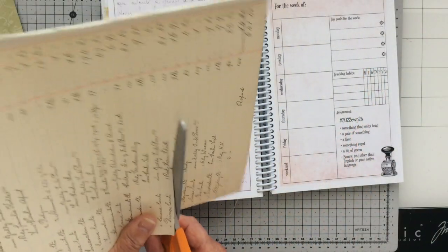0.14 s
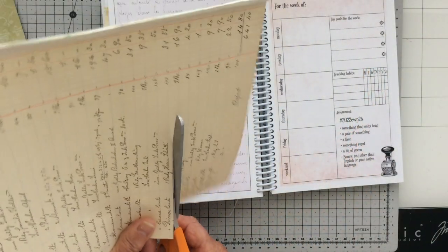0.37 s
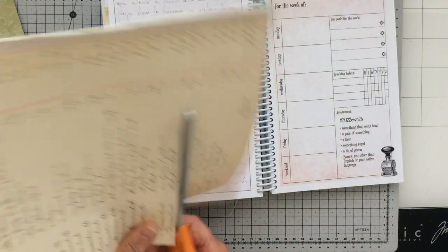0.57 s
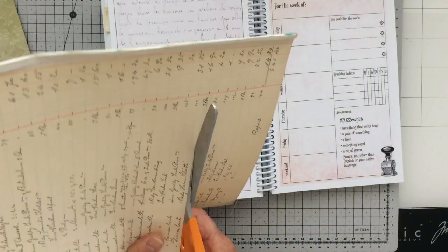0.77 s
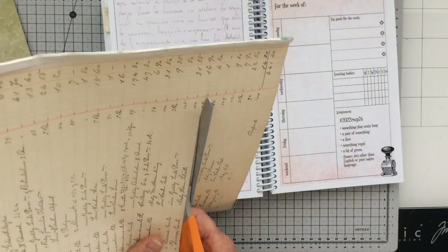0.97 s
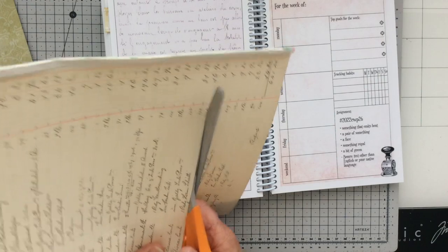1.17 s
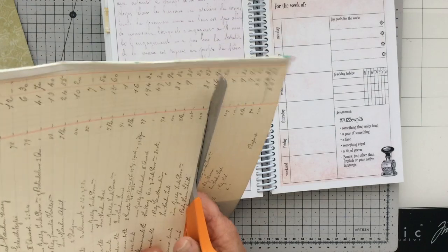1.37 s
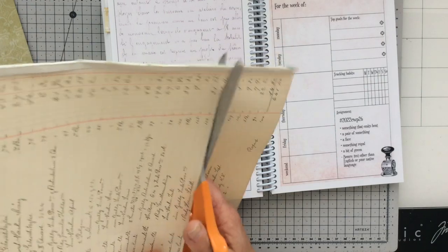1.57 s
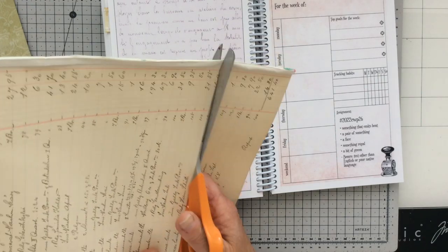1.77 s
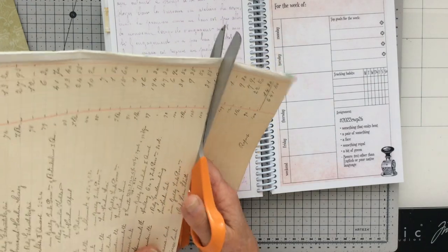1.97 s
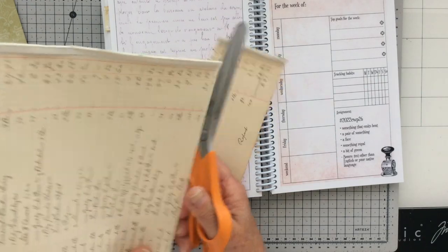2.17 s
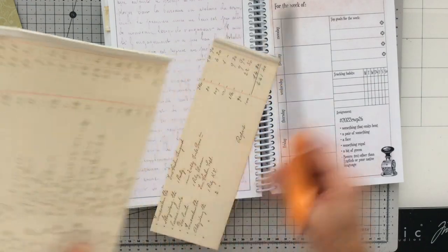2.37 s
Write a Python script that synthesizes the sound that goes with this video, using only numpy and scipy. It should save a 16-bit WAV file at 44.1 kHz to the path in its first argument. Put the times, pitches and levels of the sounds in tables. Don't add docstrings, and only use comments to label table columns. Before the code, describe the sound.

Close, crisp scissor snips shear stiff old paper, with scraping blades, small rips and papery pops.

```python
import sys
import numpy as np
from scipy import signal
from scipy.io import wavfile
from scipy.ndimage import uniform_filter1d

SR = 44100
rng = np.random.default_rng(int(sys.argv[2]) if len(sys.argv) > 2 else 0)


def digitize_waveform(pressure):
    field = np.atleast_2d(pressure).T
    bounded = np.clip(field, -1, 1)
    quanta = np.round(bounded * 32767).astype(np.int16)
    wavfile.write(sys.argv[1], SR, quanta)


def amplitude_ratio(level_db):
    exponent = np.asarray(level_db, float) / 20
    return 10 ** exponent


N = 106942

# f/Hz, density/dB per Hz
CUT_SHEET = [(60, -38), (280, -15), (450, -6), (1000, -3.5), (2000, -1), (3100, -6), (3900, -8.5),
             (7500, -61)]
BLADE_DB = -9


def evened(x):
    return x / np.sqrt(np.mean(x ** 2) + 1e-20)


def read(points, hz):
    f, value = np.transpose(points)
    return np.interp(np.log(hz + 1), np.log(f + 1), value)


def colour(x, points):
    hz = abs(np.fft.fftfreq(4096, 1 / SR))
    log_gain = np.log(amplitude_ratio(np.maximum(read(points, hz), -100)))
    taps = np.fft.ifft(np.exp(np.conj(signal.hilbert(log_gain)))).real[:2048]
    return evened(signal.oaconvolve(x, taps)[:N])


def mode(x, hz, width):
    r = np.exp(-np.pi * width / SR)
    poles = [1, -2 * r * np.cos(2 * np.pi * hz / SR), r * r]
    once = signal.lfilter([1, 0, -1], poles, x)
    return evened(signal.lfilter([1], poles, once))


def fibres(per_s, spread_db, clump_db, clump_s):
    draw = rng.random((N, 3))
    width = int(clump_s * SR)
    clumps = uniform_filter1d(uniform_filter1d(rng.standard_normal(N), width), width)
    spread = np.minimum(-np.log(draw[:, 1] + 1e-9), 4)
    size = amplitude_ratio(spread_db * spread + clump_db * evened(clumps))
    snaps = draw[:, 0] < per_s / SR
    return evened(size * snaps * np.sign(draw[:, 2] - .5))


def patches(clicks, sheet):
    patch_q, taut_hz, count = 4.96, 1300, 24
    which = rng.integers(0, count, N)
    t, out = np.arange(900) / SR, np.zeros((2, N))
    for k, hz in enumerate(np.geomspace(200, 5000, count)):
        decay = np.exp(-np.pi * hz * t / patch_q)
        tap = np.sqrt(hz) * decay * np.cos(2 * np.pi * hz * t)
        out[int(hz > taut_hz)] += signal.oaconvolve(clicks * (which == k), tap)[:N]
    return [colour(v, sheet) for v in out]


def blade_ring(x):
    # f/Hz, width/Hz, level/dB
    steel_modes = [(2430, 390, -7.5), (2750, 63, -11), (3270, 140, -9.5), (5110, 370, -19.5),
                   (5880, 2000, -7.5), (7120, 1460, -10.5), (7680, 600, -15), (8400, 1100, -15),
                   (13130, 1200, -28.5)]
    return sum(amplitude_ratio(db) * mode(x, hz, width) for hz, width, db in steel_modes)


def friction(gains, sheet, tears, grit):
    # f/Hz, density/dB per Hz
    edge_hiss = [(1500, -50), (3000, -10.5), (4000, -2.5), (5200, -2.5), (6500, -3.5), (8500, -2),
                 (13000, -7), (16000, -13.5)]
    edge = evened(grit + tears / 2)
    slack, taut = patches(tears, sheet)
    layers = [slack, taut, colour(edge, edge_hiss), blade_ring(edge)]
    return (gains * layers).sum(0)


def pressure(strokes, ring_dbs, crisp_dbs):
    t, out = np.arange(N) / SR, np.zeros((4, N))
    for rows, ring_db, crisp_db in zip(strokes, ring_dbs, crisp_dbs):
        s, db, share_db = np.transpose(rows)
        level = np.interp(t, s, db, left=-150, right=-150)
        edge = level + BLADE_DB + np.interp(t, s, share_db)
        out += amplitude_ratio([level - 1.0, level - 6.5 + crisp_db, edge, edge + ring_db])
    return out


def wavelets(rows):
    onset_cycles, cut_share = 0.57, 0.26
    lead, out = 2000, np.zeros(N + 8000)
    for s, db, hz, cycles in rows:
        t = (np.arange(-lead, 3 * lead) - s * SR % 1) / SR
        onset = -(hz * t / onset_cycles) ** 4
        decay = -(2 * hz * abs(t) / cycles) ** 1.8
        wave = np.exp(np.where(t < 0, onset, decay)) * np.cos(2 * np.pi * hz * t)
        cut = signal.butter(2, cut_share * hz, "high", fs=SR, output="sos")
        out[int(s * SR):][:len(t)] -= amplitude_ratio(db) * signal.sosfilt(cut, wave)
    return out[lead:][:N]


def room_tone():
    # f/Hz, density/dB per Hz
    air = [(25, 3), (65, -1), (150, 5), (400, -10.5), (1000, -7), (2500, -9.5), (7000, -18), (16000, -26)]
    return amplitude_ratio(-70) * colour(rng.standard_normal(N), air)


def slides_and_brushes():
    # t/s, pressure/dB, blade share/dB
    slides = [
        [(.072, -68, 17), (.093, -55, 18.5), (.135, -51.5, 8), (.241, -51.5, 3), (.282, -61, 2)],
        [(.625, -65, 0.5), (.68, -45.5, 9), (.715, -43.5, 1), (.76, -55.5, -2.5), (.85, -55, 0), (.94, -75, -5)],
        [(1.18, -64, 2.5), (1.255, -47, 0), (1.29, -55.5, 2.5), (1.39, -56, 0), (1.41, -75, 5)],
        [(1.6, -61.5, 9), (1.64, -43.5, -0.5), (1.688, -48, 6.5), (1.71, -65, 0), (1.75, -69, -1)],
        [(1.92, -80, 7), (1.958, -53.5, 4), (2.012, -41.5, 1.5), (2.06, -60.5, -0.5), (2.125, -71.5, 0)],
    ]
    # t/s, pressure/dB, blade share/dB
    brushes = [
        [(0, -54.5, -0.5), (.025, -58.5, 12.5), (.045, -55, 9), (.075, -61, 5.5)],
        [(2.32, -59, -1), (2.375, -66, 6), (2.4, -68.5, 13), (2.43, -63.5, 6)],
    ]
    slide_ring = [-10, -6, 3, 3.5, -3]
    slide_crisp = [5.5, -1, -11, -2, 4.5, -1, -0.5]
    # f/Hz, density/dB per Hz
    rubbed_sheet = [(60, -37.5), (400, -8.5), (1080, -1), (2400, 6), (3500, 1.5), (7500, -20)]
    gains = pressure(slides + brushes, slide_ring + [-9, -9], slide_crisp)
    tears, grit = fibres(14000, 2.6, .8, .003), fibres(16000, 2.2, .6, .003)
    return amplitude_ratio(-1) * friction(gains, rubbed_sheet, tears, grit)


def short_rips():
    # t/s, level/dB, length/s, blade share/dB
    rip_rows = [(0.023, -55, 0.014, -22), (0.2975, -35, 0.002, -4.5), (0.376, -36, 0.0018, 15),
                (0.412, -51, 0.008, 9), (0.505, -50, 0.0047, 4), (0.549, -46, 0.0062, 1),
                (0.567, -49.5, 0.0073, 3.5), (0.976, -47, 0.023, 6.5), (1.035, -45, 0.027, 7.5),
                (1.073, -41.5, 0.018, 4.5), (1.494, -37.5, 0.0082, 4.5), (1.758, -48, 0.0036, 2),
                (1.771, -57, 0.0029, 13), (1.78, -40.5, 0.007, 4.5), (1.786, -47.5, 0.0026, 7),
                (1.805, -42, 0.012, 10), (1.828, -41, 0.011, 8.5), (2.134, -44, 0.014, 7),
                (2.152, -40.5, 0.0023, 7), (2.179, -51, 0.0086, 7), (2.187, -41, .012, 12),
                (2.203, -53, 0.025, 6), (2.218, -38.5, 0.024, -0.5), (2.242, -51.5, 0.015, 7),
                (2.263, -54.5, 0.029, 5), (2.277, -48.5, 0.009, 8), (2.289, -43.5, 0.013, 7),
                (2.299, -50, 0.019, -23), (2.3056, -40.5, 0.001, 14.5)]
    rise_s, fall_s, sag_db, ring_db = .002, .0028, -7, -4
    t, gains = np.arange(4000) / SR, np.zeros((4, N + 4000))
    for s, db, length, share_db in rip_rows:
        rise = np.minimum(t / rise_s, 1)
        fall = np.exp(-np.maximum(t - length, 0) / fall_s)
        shape = rise * fall * amplitude_ratio(sag_db * np.minimum(t / length, 1))
        edge_db = db + BLADE_DB + share_db
        levels = amplitude_ratio([[db + 1.0 - share_db / 2], [db + 1.5], [edge_db], [edge_db + ring_db]])
        gains[:, round(s * SR):][:, :len(t)] += shape * levels
    tears, grit = fibres(12000, 0.97, 1.0, 0.012), fibres(14000, 1.03, 0.17, 0.004)
    return friction(gains[:, :N], CUT_SHEET, tears, grit)


def buckling_pops():
    # t/s, peak/dB, f/Hz, length/cycles
    pop_rows = [(.0285, -37.5, 570, 5), (.0508, -34, 880, 1.1), (.057, -37.5, 1070, 8.4),
                (.1065, -31, 620, 0.38), (.2957, -18.5, 1065, 1), (.296, -36, 3580, 1.1),
                (.3795, -31, 430, 1.9), (1.1003, -29.5, 840, 1.3), (1.116, -33.5, 540, 2.2),
                (1.125, -37, 510, 3.5), (1.456, -38, 860, 0.74), (1.525, -36, 800, 8.2),
                (1.6245, -24.5, 1320, 1.8), (2.031, -34, 410, 0.97), (2.2215, -32.5, 440, 0.32),
                (2.229, -34, 763, 9.9), (2.305, -47, 790, 9)]
    return wavelets(pop_rows)


def hand_bumps():
    # t/s, peak/dB, f/Hz
    bump_rows = [(.065, -57, 111), (0.107, -54.5, 80.6), (0.479, -60, 99), (.69, -66, 101),
                 (0.849, -66, 65), (1.111, -64, 90), (1.861, -67, 65), (2.17, -63, 91), (0.257, -62.5, 90),
                 (2.053, -63, 91), (0.524, -55, 65), (0.739, -61.5, 65.5), (2.232, -47.5, 125)]
    return wavelets([(s, db, hz, 2.5) for s, db, hz in bump_rows])


def crackles():
    # centre t/s, level/dB, f/Hz, length/s
    crackle_rows = [(.381, -37, 2700, 0.0036), (0.391, -48, 860, 0.0074), (0.42, -42, 1080, 0.018),
                    (0.422, -46, 2960, 0.011), (0.461, -49.5, 437, 0.031), (0.486, -49.5, 430, .012),
                    (0.507, -44, 974, 0.015), (0.556, -48, 494, .012), (0.554, -49, 1720, 0.014),
                    (.38, -47, 5760, 0.0046), (0.982, -40.5, 1790, 0.007), (0.997, -44, 1100, .008),
                    (1.017, -44, 1350, 0.023), (1.041, -42, 1740, 0.011), (1.049, -39.5, 1040, 0.013),
                    (1.046, -45.5, 506, 0.011), (1.061, -40.5, 480, 0.012), (1.083, -44, 1480, 0.0057),
                    (1.081, -49, 5000, 0.005), (0.703, -54, 385, .07), (1.441, -40, 1910, 0.013),
                    (1.444, -41.5, 995, 0.018), (1.445, -43.5, 3030, 0.012), (1.458, -48.5, 5340, 0.043),
                    (1.48, -48, 820, 0.012), (1.506, -48.5, 5200, 0.017), (1.538, -49, 2480, 0.011),
                    (1.54, -51, 5400, 0.02), (1.547, -51.5, 750, 0.032), (1.627, -45.5, 960, 0.01),
                    (1.674, -48.5, 2750, 0.054), (1.668, -56, 5760, 0.059), (2.405, -65.5, 4260, 0.038),
                    (0.152, -56, 2500, 0.1), (1.772, -48, 2700, 0.0035), (1.785, -37, 2730, 0.0021),
                    (1.812, -39, 2750, 0.016), (1.807, -38, 1900, 0.0073), (1.817, -40.5, 960, 0.0088),
                    (1.833, -42, 510, 0.016), (1.86, -58, 525, 0.0071), (2.139, -46, 2250, .009),
                    (2.14, -47.5, 923, 0.018), (2.184, -49, 643, 0.0077), (2.192, -42, 2110, 0.0083),
                    (2.193, -41, 4600, 0.0091), (2.202, -49, 600, 0.01), (2.231, -38, 1600, 0.01),
                    (2.314, -44.5, 742, 0.0084)]
    crackle_q = 5.7
    t, out = (np.arange(6000) - 3000) / SR, np.zeros(N + 6000)
    grits = rng.standard_normal((len(crackle_rows), len(t)))
    for (s, db, hz, length), grit in zip(crackle_rows, grits):
        swell = np.exp(-(2 * t / length) ** 4)
        burst = swell * mode(grit ** 3, hz, hz / crackle_q + 60)
        burst *= np.linalg.norm(swell) / np.linalg.norm(burst)
        out[round(s * SR):][:len(t)] += amplitude_ratio(db) * burst
    return out[len(t) // 2:][:N]


def closing_cuts():
    # t/s, pressure/dB, blade share/dB
    cuts = [
        [(.365, -56, -14), (.379, -47, 4), (.393, -47, 3.5), (.47, -48.5, -1), (.51, -46, -6.5),
         (.544, -53, -0.5), (.575, -61, -8), (.61, -111, -3)],
        [(.955, -66, -20), (.972, -54, -9), (.98, -46, 3), (1.03, -43.5, 1.5), (1.09, -47, 2), (1.126, -46, 3),
         (1.15, -54, -1), (1.175, -67, -14)],
        [(1.43, -83, -2), (1.436, -45, 4.5), (1.45, -41, 1.5), (1.49, -42, 2.5), (1.51, -47.5, 0),
         (1.541, -45, -2), (1.575, -63, 15), (1.61, -49.5, -6)],
        [(1.772, -56.5, 7.5), (1.795, -48.5, 3), (1.82, -47, 0), (1.845, -52.5, 8), (1.868, -52, 3),
         (1.885, -76, 1), (1.92, -72, 6)],
    ]
    cut_ring = [-36, -1.5, 2.5, 5.5]
    cut_crisp = [3, 2, -2.5, 5]
    tears, grit = fibres(8000, 3.9, 1.2, .002), fibres(10000, 3.7, 1.4, .002)
    return friction(pressure(cuts, cut_ring, cut_crisp), CUT_SHEET, tears, grit)


def room(x):
    # f/Hz, t60/s
    decay_times = [(200, 0.47), (1000, 0.13), (4000, 0.14), (12000, 0.17)]
    desk_s, desk_db, wet_db = .0052, -18.5, -13.5
    noise = rng.standard_normal(SR // 2) * (np.arange(SR // 2) > 350)
    hz, t, z = signal.stft(noise, SR, nperseg=256)
    decay = amplitude_ratio(-60 * t / read(decay_times, hz)[:, None])
    tail = signal.istft(z * decay, SR, nperseg=256)[1]
    tail = amplitude_ratio(wet_db) * tail / np.linalg.norm(tail)
    tail[int(desk_s * SR)] += amplitude_ratio(desk_db)
    return x + signal.fftconvolve(x, tail)[:N]


def scene():
    rubbing = slides_and_brushes() + closing_cuts()
    bursts = short_rips() + buckling_pops() + crackles()
    return (room(rubbing + bursts) + hand_bumps() + room_tone())[None]


def roll_off(x):
    return signal.sosfilt(signal.butter(12, 16460, fs=SR, output="sos"), x)


def record(dry):
    low_cut_hz, edge_hz = 54, 15950
    x = signal.sosfilt(signal.butter(2, low_cut_hz, "high", fs=SR, output="sos"), dry)
    band_limit = signal.firwin(511, edge_hz, window=("kaiser", 9), fs=SR)
    x = signal.oaconvolve(x, band_limit[None], "same")
    return roll_off(x)


dry = scene()
out = record(dry)
digitize_waveform(out)
```